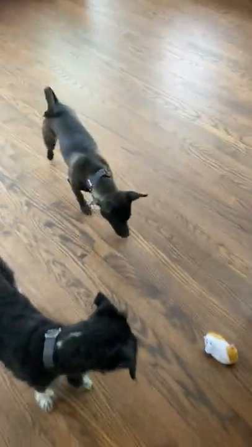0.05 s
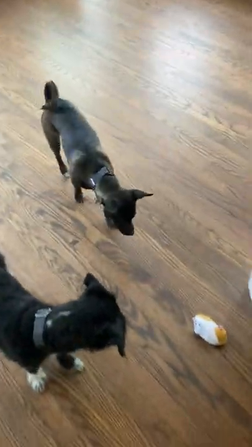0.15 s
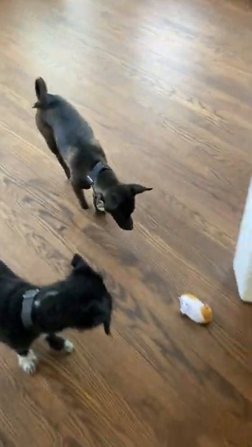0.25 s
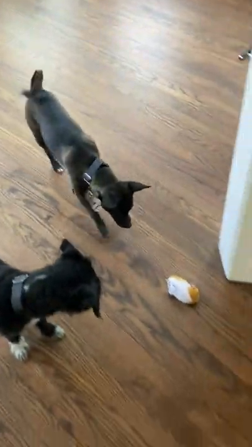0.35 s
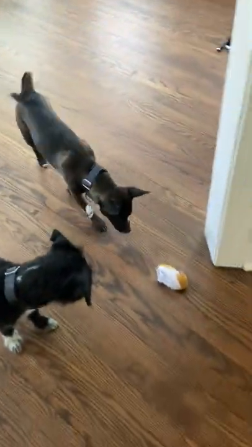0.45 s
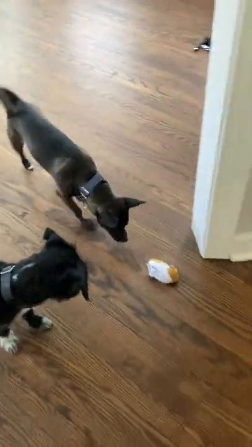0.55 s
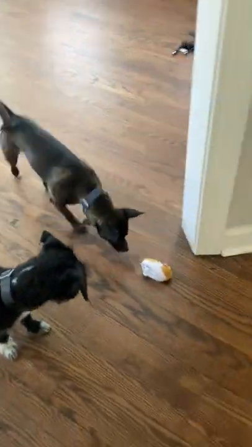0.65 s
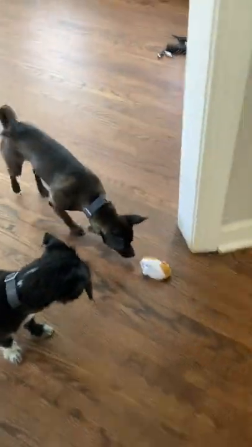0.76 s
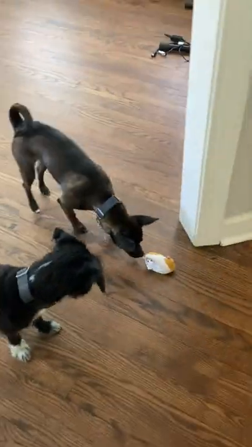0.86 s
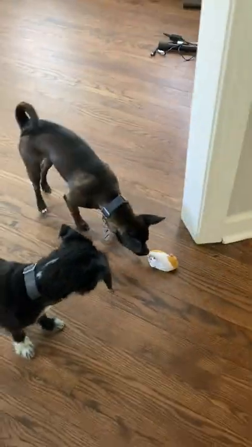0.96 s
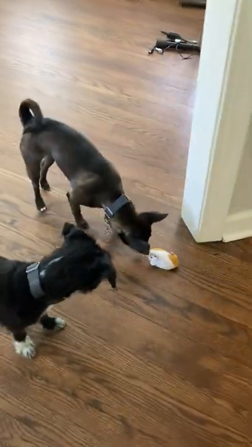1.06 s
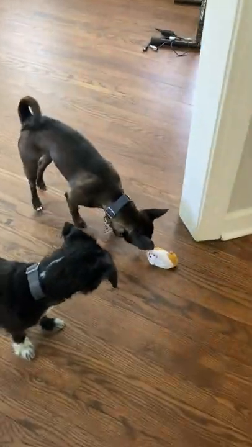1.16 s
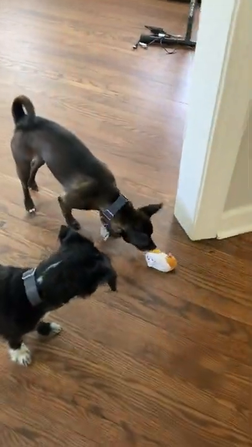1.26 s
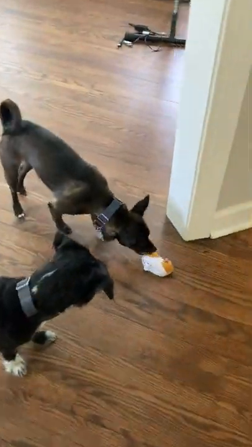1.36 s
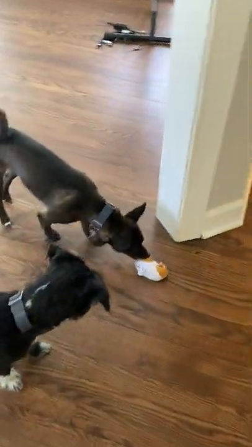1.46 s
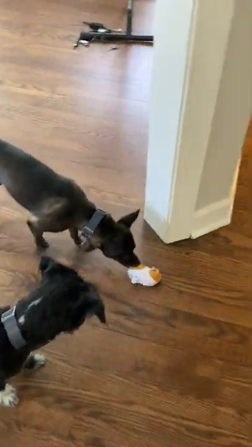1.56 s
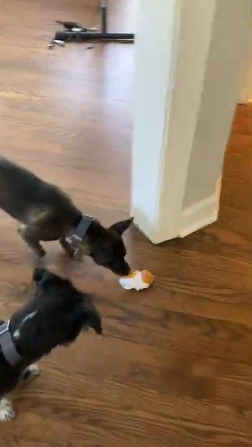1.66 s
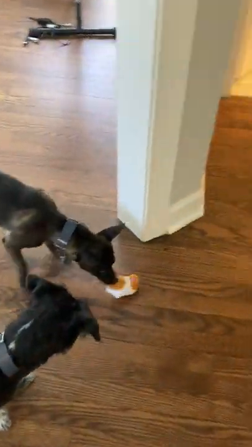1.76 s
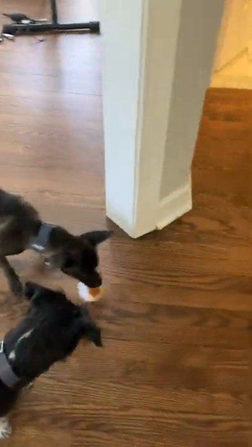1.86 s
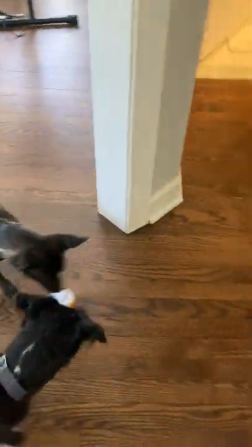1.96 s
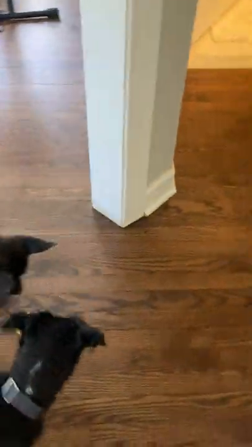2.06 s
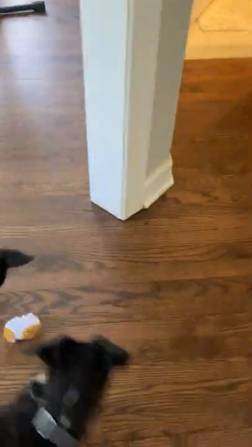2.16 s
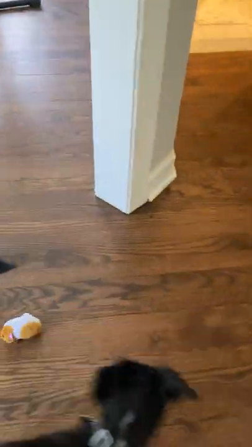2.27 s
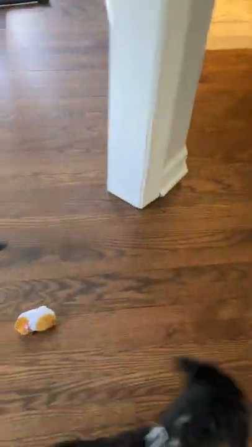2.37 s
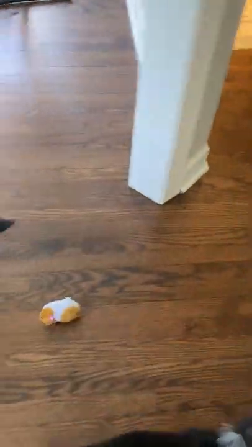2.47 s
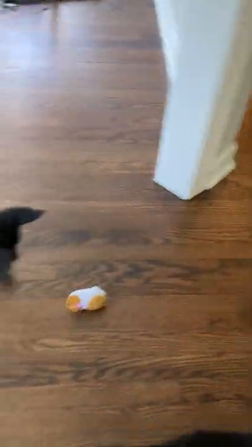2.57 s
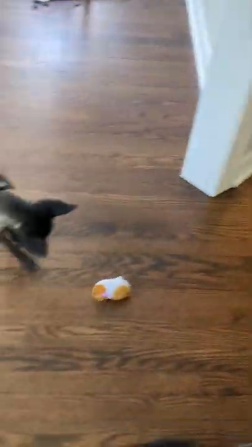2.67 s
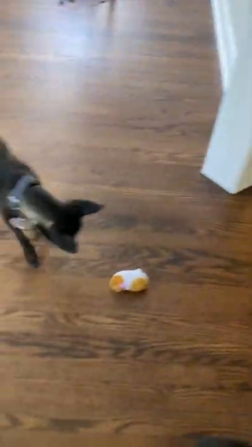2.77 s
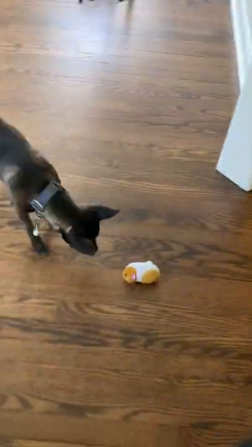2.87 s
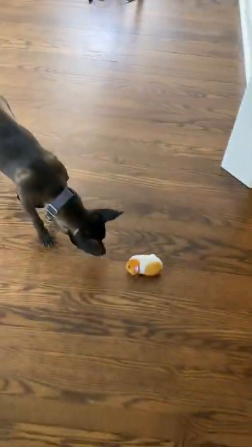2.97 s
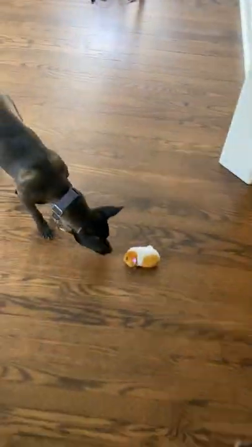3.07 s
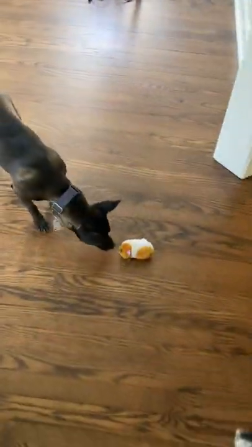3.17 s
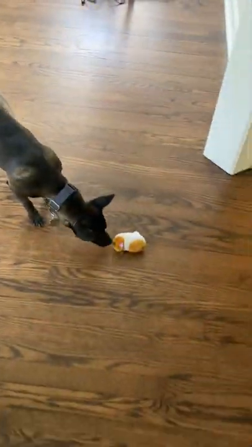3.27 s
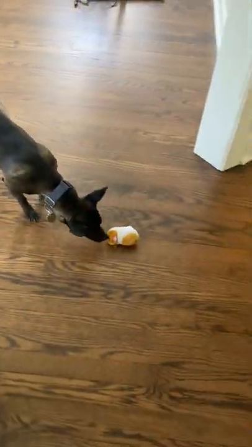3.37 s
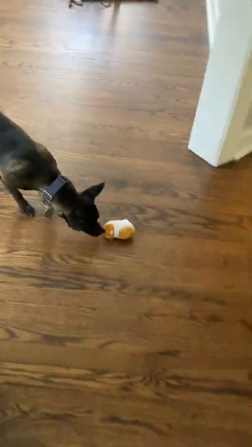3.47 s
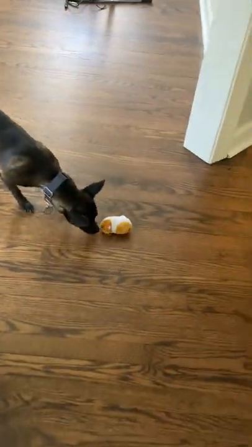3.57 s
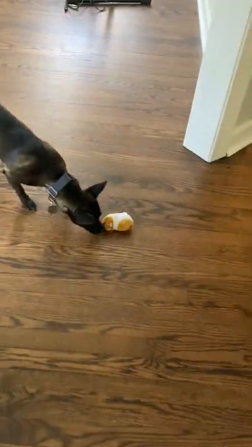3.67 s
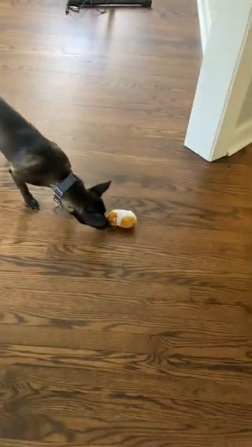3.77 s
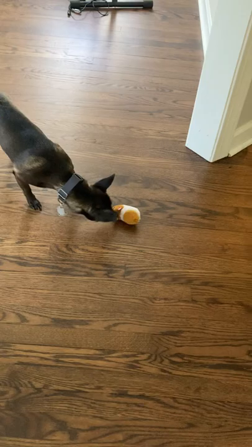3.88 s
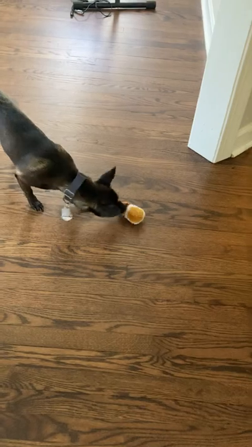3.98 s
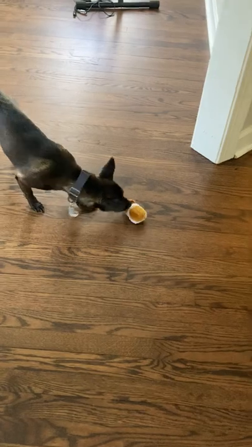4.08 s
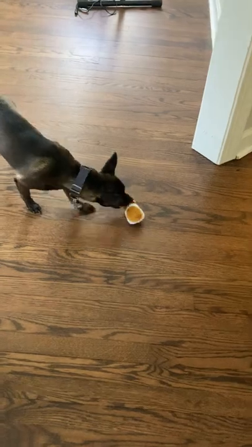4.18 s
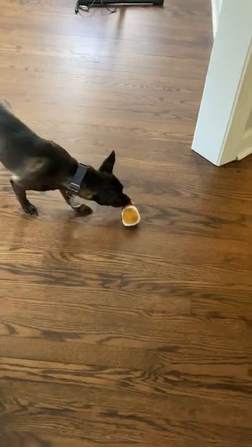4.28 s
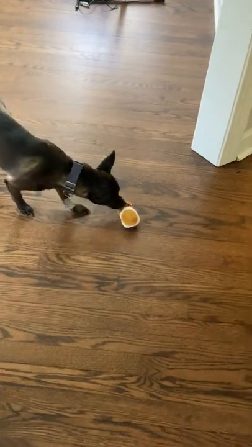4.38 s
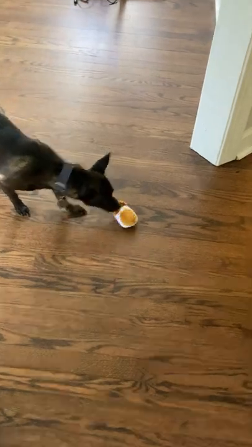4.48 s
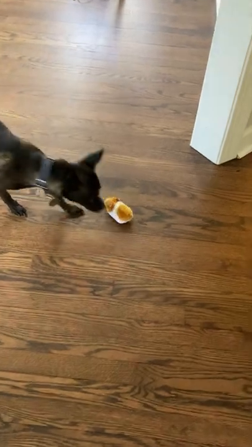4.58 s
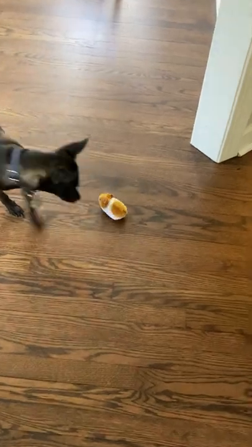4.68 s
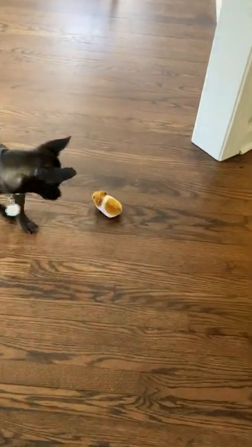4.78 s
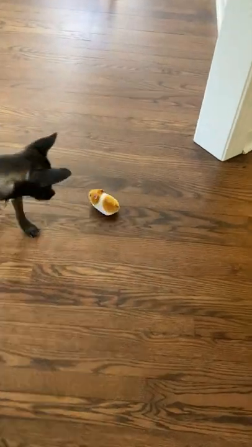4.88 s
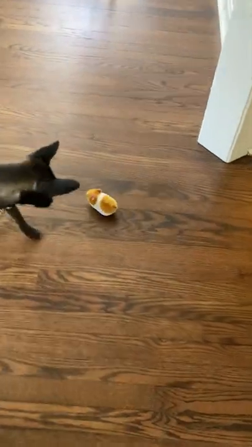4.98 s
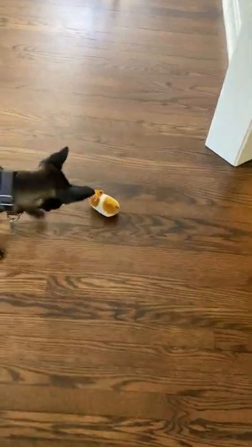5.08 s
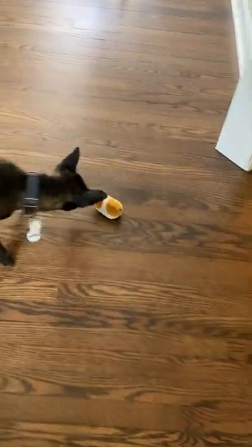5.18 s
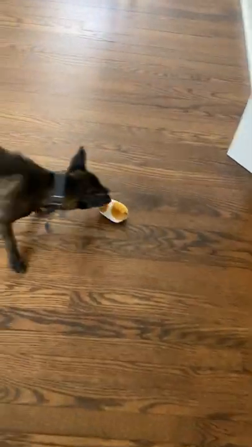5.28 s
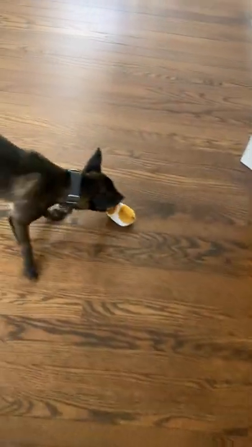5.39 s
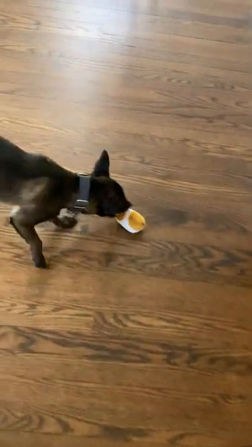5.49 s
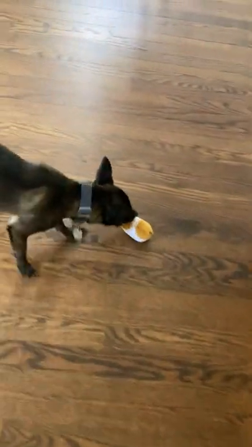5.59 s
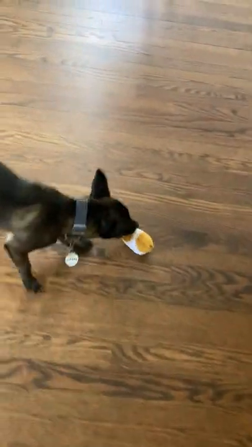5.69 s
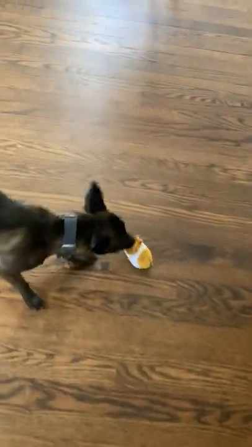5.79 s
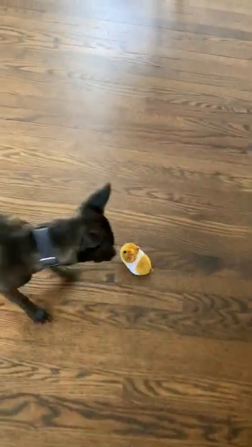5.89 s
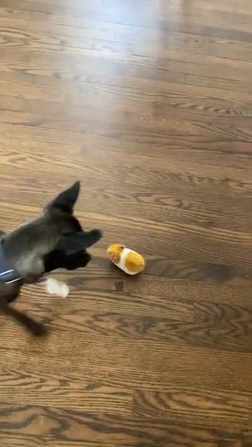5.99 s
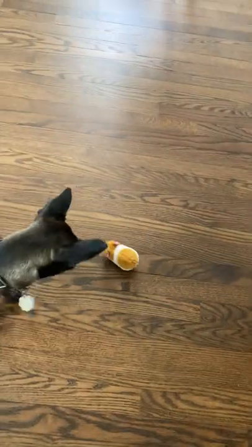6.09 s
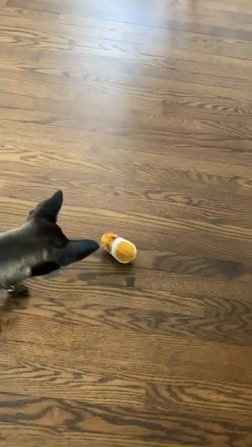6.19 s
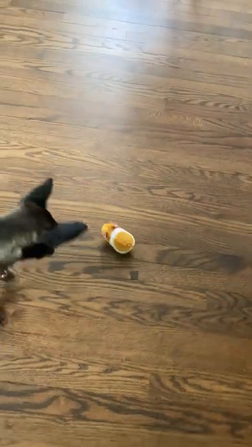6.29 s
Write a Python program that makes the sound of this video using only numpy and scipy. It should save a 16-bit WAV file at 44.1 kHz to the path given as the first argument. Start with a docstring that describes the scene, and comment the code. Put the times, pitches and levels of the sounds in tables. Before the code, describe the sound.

Dog collar tags clink in short bright bursts as claws click and paws thud on a wood floor beside a faintly whirring toy.

```python
"""Collar tags clink: each meeting excites decaying metal modes, beside the clear tones of a collar ring.
Dogs' claws click, as noise ticks and damped board modes; paws thud, as fading narrow-band floor booms.
Pads and a toy slide with filtered friction noise; the toy's motor whirs, gear teeth ringing its shell.
House hum and drifting room tone lie beneath, and the bare room adds a decaying noise tail.
A stereo widening shifts the right channel's phase, and a low-pass removes the highest treble."""
import sys
import numpy as np
from scipy import signal
from scipy.fft import rfft, irfft, next_fast_len
from scipy.io import wavfile
from scipy.ndimage import uniform_filter1d

SR = 44100
rng = np.random.default_rng(int(sys.argv[2]) if len(sys.argv) > 2 else 0)


def voltage_ratio(decibels):
    """Convert decibels (scalar or array-like) to amplitude ratios, 20 dB per decade."""
    exponent = np.asarray(decibels, float) / 20
    return 10 ** exponent


def materialize(psi):
    """Save the field psi as 16-bit PCM at rate SR to the path in sys.argv[1].

    A 1-D psi becomes a single channel; in a 2-D psi each row is a channel.
    """
    bounded = np.clip(np.atleast_2d(psi).T, -1, 1)
    quanta = np.round(bounded * 32767).astype(np.int16)
    wavfile.write(sys.argv[1], SR, quanta)


N = 279594
T = np.arange(N) / SR  # seconds

# Ringing modes of a floor board. Each row: frequency in Hz, bandwidth in Hz, relative level in dB.
KNOCK = [(1001, 190, -10.5), (1120, 200, -5.5), (1340, 470, -1.5), (1667, 260, -1), (1920, 220, 0),
         (2360, 200, 6.5)]


def colour(x, points):
    """Linear filtering in the frequency domain: (Hz, dB) points joined on a log-frequency axis."""
    hz, db = np.transpose(points)
    size = next_fast_len(N, real=True)
    f = np.arange(size // 2 + 1) * SR / size
    gain = voltage_ratio(np.interp(np.log(f + 1), np.log(hz), db))
    return irfft(rfft(x, size) * gain, size)[..., :N]


def ring(x, modes):
    """Modal superposition: two-pole resonances (Hz, width Hz, dB) summed with alternating sign."""
    out = 0
    for k, (hz, width, db) in enumerate(modes):
        out = out + (-1) ** k * voltage_ratio(db) * signal.lfilter(*signal.iirpeak(hz, hz / width, SR), x)
    return out


def unit(x):
    """Normalization of a signal to an rms of 1."""
    return x / np.sqrt(np.mean(x ** 2))


def walk(rate):
    """Slow random modulation: `rate` new levels a second joined by straight lines, spread near 1."""
    k = int(SR / rate)
    levels = np.repeat(rng.standard_normal(N // k + 1), k)
    return 1.2 * uniform_filter1d(levels, k)[:N]


def bursts(times, peak_db, fade_s):
    """Impulsive contact noise: white noise under a critically damped envelope that swells and fades."""
    env = np.zeros(N)
    env[(np.asarray(times) * SR).astype(int)] = voltage_ratio(peak_db)
    pole = np.exp(-1 / (fade_s * SR))
    env = signal.lfilter([np.e * (1 - pole)], [1, -2 * pole, pole ** 2], env)
    return env * rng.standard_normal(N)


def house():
    """Broadband and tonal background: noise bands drift alone, and narrow-band hum wavers around tones."""
    # Room tone. Each row: frequency in Hz, spectral density in dB per Hz before the drift.
    air_density = [(28, -130), (40, -99), (55, -70.5), (90, -79.5), (160, -74.5), (260, -82.5), (400, -88),
                   (700, -94.5), (1300, -98), (2000, -102), (3000, -105), (5000, -103), (6000, -106),
                   (9000, -102), (15000, -104)]
    # Limits in Hz between the bands that drift alone.
    air_splits_hz = [300, 900, 2500]
    # Hum. Each row: frequency in Hz, width in Hz, steady tone against the noise part in dB,
    # then the level in dB at each of the hum times.
    hum_modes = [(58.5, 2.53, -2, -67, -64, -69, -65), (120.4, 2.87, 1, -53.5, -51.5, -59.5, -52),
                 (221.8, 7.6, -5.5, -58, -59.5, -61, -64), (252.5, 3.555, 1, -65, -63, -56, -63.5),
                 (343.8, 6, -9.5, -73, -71, -67, -70), (506, 14, -11, -70, -73.5, -76.5, -79)]
    # Times in seconds of the hum levels.
    hum_s = [0, 2.6, 3.6, 6.34]

    # the two channels get unrelated noise
    rest = colour(rng.standard_normal((2, N)), air_density) * np.sqrt(SR) * voltage_ratio(0.55 * walk(5.6))
    air = 0
    for hz in air_splits_hz:
        low = signal.sosfilt(signal.butter(2, hz, fs=SR, output="sos"), rest)
        air = air + low * voltage_ratio(0.7 * walk(1.7) + 1.2 * walk(12))
        rest = rest - low
    top_band = rest * voltage_ratio(1.8 * walk(1.63))

    noise, hum = rng.standard_normal(N), 0
    for hz, width, tone_db, *db in hum_modes:
        tone = np.sqrt(2) * np.sin(2 * np.pi * np.cumsum(hz + width * walk(4.0)) / SR)
        flutter = unit(ring(noise, [(hz, width, 0)]))
        hum = hum + voltage_ratio(np.interp(T, hum_s, db)) * unit(flutter + voltage_ratio(tone_db) * tone)
    return air + top_band + hum


def toy():
    """Periodic excitation of a resonator: gear teeth tick unevenly each motor turn and ring the shell."""
    # Motor, slowed when a nose holds it. Each row: time in seconds, mean turns per second,
    # level in dB, slip (unsteady speed) from 0 to 1, turned away from 0 to 1.
    motor = [(0, 103.3, -51.5, 0.02, 0.37), (.5, 103, -55.5, 0.03, 0.2), (.9, 102.7, -54.5, 0, 0.17),
             (1.35, 102.7, -53, 0, 0.14), (1.7, 101.9, -56.5, 0.12, 0.54), (1.9, 95.5, -60, 0.35, 0.6),
             (2.8, 96.5, -54, 0.38, 0.39), (3.1, 102.9, -59, 0.07, 0.6), (3.8, 103.8, -62.5, 0.02, 0.16),
             (4.1, 91.4, -65, 0.23, 1), (4.9, 86.3, -59.5, 0.14, 0.9), (5.5, 88.6, -57.5, 0.61, 0.53),
             (6.34, 88.8, -60, 0.47, 0.8)]
    # Plastic shell resonances. Each row: frequency in Hz, width in Hz of the first of two filters,
    # level in dB facing, level in dB turned away, other teeth in dB, loose rattle noise in dB.
    shell_modes = [(1865, 44, -13, -7, 11, -33), (2524, 270, -12, -1.5, 4.5, -29),
                   (4180, 1260, -17.5, 1, 7, -22.5), (6550, 280, 0.5, 5.5, 3, -26),
                   (8230, 300, -6, 12, -5.5, -29), (8605, 460, 1, 2.5, 0, -27.5),
                   (10180, 640, 1, -0.5, -7, -27), (11150, 830, 1, -6, -8.5, -19),
                   (10960, 660, -9.5, 2.5, 3, -39), (12240, 1160, -0.5, -2.5, 6, -33),
                   (13850, 2300, -2.5, -22, -12, -22)]
    teeth = [(0, -1.5), (0.26, -11.0), (0.45, 1), (0.71, 1.0)]  # place within a turn, dB

    times = np.array(motor)[:, 0]
    _, hz, db, slip, away = (np.interp(T, times, column) for column in np.transpose(motor))
    turns = np.cumsum(hz * (1 + 0.000384 * walk(6.6) + 0.05 * slip * walk(25))) / SR
    ticks, taps = np.zeros((4, N + 16)), np.arange(16)
    for row, (place, tooth_db) in zip(ticks, teeth):
        at = np.interp(np.arange(1, turns[-1] - 1) + place, turns, np.arange(N))[:, None]
        chance = rng.standard_normal((800, 1))[:len(at)]
        size = voltage_ratio(tooth_db + 1.2 * chance)
        # a windowed sinc places each tick between samples
        np.add.at(row, at.astype(int) + taps, size * np.sinc(taps - 8 - at % 1) * np.hanning(16))
    first_tooth = ticks[0, :N]
    other_teeth = ticks[1:, :N].sum(axis=0)
    rattle = rng.standard_normal(N)

    away = np.clip(away, 0, 1)
    shell = 0
    for f, width, near_db, far_db, others_db, rattle_db in shell_modes:
        drive = first_tooth + voltage_ratio(others_db) * other_teeth + voltage_ratio(rattle_db) * rattle
        rung = ring(ring(drive, [(f, width, 0)]), [(f, 2.0 * width, 0)])
        shell = shell + voltage_ratio(near_db + away * (far_db - near_db)) * rung
    return voltage_ratio(db) * unit(shell)


def slides():
    """Stick-slip friction: small random catches make a low scrape, grit and a bright rustle."""
    # Pads and toy sliding. Each row: start in seconds, length in seconds until the release,
    # relative level in dB, grit against it in dB, treble against it in dB.
    slide_rows = [(1.785, 0.037, -59, 0, -12), (2.059, 0.19, -43.5, -5.5, -2.5),
                  (2.254, 0.21, -52.5, 2.5, 1), (3.397, 0.096, -65, -2, -2), (3.736, 0.04, -63, -3, -2),
                  (3.948, 0.058, -51.5, 1.5, -3.5), (4.083, 0.053, -58, -4.5, -15),
                  (4.202, 0.12, -60, -5, -13), (4.412, 0.03, -56.5, -2.5, -19),
                  (4.438, 0.033, -56.5, -2, -16), (4.506, 0.1, -53.5, 4.5, -4.5),
                  (5.068, 0.049, -66.5, -2, -21), (5.538, 0.039, -64, -1, 6), (5.765, 0.043, -58.5, -7, 6),
                  (5.994, 0.032, -61, 14, -7), (6.055, 0.18, -55, 0.5, -2)]
    # Scrape spectrum. Each row: frequency in Hz, relative level in dB.
    scrape_points = [(400, -15), (750, -6), (900, -3), (1030, -3), (1180, 1), (1500, -5.5), (1900, -3),
                     (2400, -19), (3000, -17.5)]
    # Grit spectrum. Each row: frequency in Hz, relative level in dB.
    grit_points = [(2000, -23), (2800, -5), (3500, -7), (4300, -1.5), (5000, -1), (6500, -32)]
    attack_s, sag_db_s, release_db_s = 0.0064, 49.5, 161
    pecks_per_s, peck_db = 90, -8  # tiny knocks on the board within a slide

    chance = rng.exponential(size=N // 100 + 1).repeat(100)[:N]
    catches = voltage_ratio(2.8 * np.minimum(chance, 5.0))
    friction = rng.standard_normal((3, N)) * uniform_filter1d(catches, size=30) * voltage_ratio(4.5 * walk(30))
    pecks = (rng.random(N) < pecks_per_s / SR) * rng.standard_normal(N)
    scrape = unit(colour(friction[0], scrape_points)) + voltage_ratio(peck_db) * unit(ring(pecks, KNOCK))
    rustle = unit(ring(friction[1], [(8850, 1300, 0)]))
    sand = unit(colour(friction[2], grit_points))
    out = np.zeros(N)
    for s, length, db, grit_db, treble_db in slide_rows:
        age = np.clip(T - s, 0, None)
        fall_db = sag_db_s * age + release_db_s * np.clip(age - length, 0, None)
        swell = voltage_ratio(db - fall_db) * np.minimum(age / attack_s, 1)
        out += swell * (scrape + voltage_ratio(grit_db) * sand + voltage_ratio(treble_db) * rustle)
    return out


def paws():
    """Impact excitation of damped floor modes: soft landings boom most near the pitch of the spot."""
    # Paws landing. Each row: time in seconds, relative level in dB, pitch of the spot in Hz.
    thuds = [(2.073, -35, 121), (2.25, -48.5, 152), (3.967, -45, 155), (4.516, -42.5, 220),
             (4.799, -50, 85), (5.125, -52, 123.8), (5.753, -39.5, 433), (5.766, -44.5, 416),
             (5.757, -44, 110), (6.013, -44, 230), (6.017, -45, 99)]
    # Floor booms. Each row: frequency in Hz, width in Hz of each of two filters, 60 dB decay in seconds.
    floor_modes = [(85, 97, 0.65), (110.6, 110, 0.47), (155, 80, 0.41), (259, 195, 0.64), (391, 152, 0.29)]
    db_per_octave = 12  # booms away from the spot's pitch are weaker

    noise, out = rng.standard_normal(N), 0
    for hz, width, t60 in floor_modes:
        boom = unit(ring(ring(noise, [(hz, width, 0)]), [(hz, width, 0)]))  # twice: steep flanks
        for s, db, spot_hz in thuds:
            age = np.clip(T - s, 0, None)
            peak_db = db - 2.0 - db_per_octave * abs(np.log2(hz / spot_hz))
            out = out + boom * voltage_ratio(peak_db - 60 * age / t60) * (1 - np.exp(-age / 0.00027))
    return out


def strike(times, peak_db, spot_hz, modes, slope_db):
    """Modal impact: each blow briefly rings slightly detuned modes, most of all those near its pitch."""
    age, out = np.arange(1000) / SR, np.zeros(N + 2000)
    hz, width, db = np.transpose(modes)[:, :, None]
    fade = age * np.pi * width
    shape = (-1) ** np.arange(len(modes))[:, None] * fade * np.exp(1 - fade)
    chance = rng.standard_normal((len(times), 3, len(modes), 1))
    for s, blow_db, spot, (size, tune, late) in zip(times, peak_db, spot_hz, chance):
        mode_db = blow_db + db - slope_db * abs(np.log2(hz / spot)) + 2.4 * size
        rings = voltage_ratio(mode_db) * shape * np.sin(2 * np.pi * hz * (1 + 0.037 * tune) * age)
        starts = ((s + 0.0005 * abs(late[:, 0])) * SR).astype(int)  # the contact rolls a little
        for start, one in zip(starts, rings):
            out[start:start + len(age)] += one
    return out[:N]


def claws():
    """Hard impact: contact noise as tick and crack, with damped modes of the claw and the board."""
    # Claws and toy striking the boards. Each row: time in seconds, tick in relative dB,
    # knock in relative dB, knock pitch in Hz, clack in relative dB, clack pitch in Hz.
    clicks = [(0.1208, -47.5, -58, 1860, -61, 4000), (1.7471, -46, -46, 1110, -51.5, 2500),
              (1.7927, -39.5, -51, 1590, -44, 2500), (2.0702, -19.5, -15.5, 1120, -34, 4150),
              (2.178, -26.5, -64, 1150, -60, 2500), (2.181, -35, -62, 1170, -60, 2500),
              (2.2463, -28.5, -28, 1460, -38.5, 3400), (2.098, -30, -38, 1150, -46, 3600),
              (2.122, -36, -36, 1600, -50, 3600), (2.209, -47, -44, 1100, -50, 2500),
              (2.29, -50, -37, 1250, -41, 3200), (2.335, -54, -44, 1200, -46, 3200),
              (2.435, -52, -48, 1390, -61, 3000), (2.4499, -38, -46, 1910, -63, 3000),
              (2.677, -70, -54, 1177, -57, 2570), (3.2454, -43, -50, 1354, -50, 4340),
              (3.4073, -47, -70, 2140, -42, 2850), (3.578, -56, -70, 1396, -59, 4120),
              (3.591, -48.5, -56, 1366, -58, 4140), (3.677, -54, -76, 1500, -59, 4570),
              (3.739, -43.5, -47, 1350, -59, 2780), (3.917, -45, -71, 955, -69, 3080),
              (3.958, -45, -49, 1290, -59, 4060), (4.014, -50, -53, 1713, -40.5, 4190),
              (4.0329, -42.5, -59, 1680, -46, 4180), (4.094, -57, -50, 1100, -60, 3120),
              (4.2, -60, -46, 1240, -65, 3950), (4.268, -64, -55, 1103, -68, 3970),
              (4.3, -42.5, -47, 1160, -49, 3230), (4.465, -52, -56, 1590, -49, 3340),
              (4.5119, -32.5, -33.5, 1230, -40, 2500), (4.542, -36, -50, 1160, -37, 4600),
              (4.5831, -39, -40, 1293, -40, 2770), (4.5828, -60, -70, 1300, -37, 4060),
              (4.593, -43, -60, 1660, -36, 4300), (4.7054, -45, -62, 1870, -55, 3940),
              (4.7163, -38.5, -63, 1880, -52, 4040), (4.855, -42.5, -72, 1300, -70, 4010),
              (4.951, -51, -72, 1312, -49.5, 4130), (5.1608, -42, -57, 1360, -51, 4250),
              (5.7475, -20, -27, 1210, -32.5, 3200), (5.8124, -54, -45, 967, -55, 2500),
              (5.965, -38.5, -52.5, 1930, -49, 2500), (5.983, -43, -61, 1413, -52, 4030),
              (6.0057, -29, -47, 2140, -31, 2730), (6.008, -24, -31.5, 1200, -38, 3080),
              (6.0587, -39, -35, 1010, -28, 4240), (6.0595, -50, -63, 1600, -37, 2890),
              (6.089, -50, -30, 1050, -54, 4300), (6.107, -41, -54, 1500, -48, 4450)]
    # Claw ring. Each row: frequency in Hz, width in Hz, relative level in dB.
    clack_modes = [(2500, 520, 2.5), (2660, 260, 2), (3200, 210, -6), (3424, 590, 6), (4230, 730, 3.5),
                   (4600, 680, 3.5)]
    # Broad crack of a knock. Each row: frequency in Hz, relative level in dB.
    crack_points = [(300, -28), (900, -21.5), (2300, 5), (4500, -12), (6000, -7)]
    crack_db = -13  # against the knock
    tick_points = [(1500, -34), (3500, -4.5), (5000, -2.5), (6000, 3.5),
                   (8500, -1.5), (12000, -0.5), (15500, -12.5)]  # Hz, dB

    s, tick_db, knock_db, knock_hz, clack_db, clack_hz = np.transpose(clicks)
    tick = colour(bursts(s, tick_db + 4.5, 0.00096), tick_points)
    crack = colour(bursts(s, knock_db + crack_db, 0.0017), crack_points)
    # modes away from the blow's pitch weaken by the last argument, in dB per octave
    knock = strike(s, knock_db, knock_hz, KNOCK, 18.5)
    clack = strike(s, clack_db, clack_hz, clack_modes, 27)
    return tick + crack + knock + clack


def collar_ring():
    """Free vibration with added damping: two clear modes fade until the fur mutes them."""
    # A tag touching the collar ring. Each row: time in seconds, high mode in dB, low mode in dB,
    # seconds until muted; levels stand before the flutter.
    ring_hits = [(2.2475, -54, -66, .03), (2.3481, -45, -60, .05), (2.7215, -45, -49.5, .09),
                 (2.918, -47.5, -60, 0.061), (5.435, -51, -66, 0.053), (5.5475, -59, -68, .03),
                 (5.589, -51, -68, .02), (6.1165, -49, -66, .04)]
    # The high and the low mode in Hz.
    ring_hz = [9218, 4242]
    t60_s, mute_db_s = 0.4, 1500

    out = 0
    for s, high_db, low_db, length in ring_hits:
        age = np.clip(T - s, 0, None)
        fall_db = 60 * age / t60_s + mute_db_s * np.clip(age - length, 0, None)
        for hz, db in zip(ring_hz, [high_db, low_db]):
            out = out + voltage_ratio(db - fall_db) * np.sin(2 * np.pi * hz * age)
    return out * voltage_ratio(1.6 * walk(90))


def tags():
    """Repeated modal excitation: each meeting stops the last ring and starts every mode anew."""
    # Tag modes. Each row: frequency in Hz, tag 0 or 1.
    tag_modes = [(6477, 0), (6545, 0), (12772, 0), (14800, 0), (14730, 0), (13005, 1), (14635, 1)]
    # How each mode rings. Each row: 60 dB decay in seconds, dB when struck at place 0, dB at place 1.
    tag_ring = [(0.2, 4, 4), (0.13, -13, -6), (0.19, 4, -22), (0.14, -14, -1), (0.17, -16, 8.5),
                (0.13, 8, -9.5), (0.15, -11, 8)]
    # Tags meeting. Each row: time in seconds, first tag in relative dB, place struck from 0 to 1,
    # second tag in relative dB, place struck from 0 to 1.
    clinks = [(0.2354, -49, 0.9, -47.5, 0.1), (1.5409, -57, 0.7, -53, 0.1), (2.2475, -28, 0.74, -28.5, 0.5),
              (2.265, -33.5, 0.05, -48, 0.5), (2.286, -42, 0.5, -39, 0.4), (2.3481, -22.5, 0.53, -50, 0.87),
              (2.3715, -29, 0.6, -48, 0.87), (2.4344, -44.5, 0.84, -57, 0.5),
              (2.5065, -38, 0.14, -44, 0.57), (2.7215, -37, 0.37, -35, 0.7), (2.918, -39, 0.04, -37, 0.45),
              (3.0097, -51.5, 0.55, -42.5, 0.25), (3.4064, -69, 1, -49, 0.7), (3.592, -72, 1, -64, .8),
              (4.7536, -39, 0.47, -60, 0.5), (4.7666, -46, 1, -45, 0.65), (5.2724, -56, 0.55, -62, 0.98),
              (5.3175, -47, 0.46, -44.5, 0.36), (5.3537, -51, 0.7, -40, 0.35),
              (5.435, -38.5, 0.87, -41, 0.45), (5.487, -48, 0.57, -42, 0.57),
              (5.5475, -49, 0.56, -39.5, 0.5), (5.589, -41, 0.45, -40, 0.4),
              (5.6111, -42.5, 0.82, -37.5, 0.28), (5.621, -52, 0.58, -45, 0.33),
              (6.0846, -45, 0.8, -68, .82), (6.1165, -21.5, 0.23, -45, 0.8), (6.142, -32.5, 0, -54, 0.4),
              (6.1993, -39, 0.48, -44.5, 0.1)]
    # Changes in the tags' ring level between clinks. Each row: time in seconds,
    # dB lost, negative where it swells.
    level_changes = [(0.27, -8), (2.298, 1), (2.364, 3), (2.395, 10), (2.446, 17), (2.752, -3), (2.976, 5),
                     (3.047, 15), (3.421, 11), (4.79, -4), (5.325, 6), (5.366, 2), (5.50, 5), (5.555, 4),
                     (5.596, 10), (5.63, -6), (5.655, 8), (6.096, 14), (6.128, 4), (6.173, 13), (6.228, 13)]
    change_s = 0.0038  # time each change takes
    tick_points = [(1500, -19), (3500, -11), (6000, 13.5), (9500, -6.5), (15000, 9)]  # Hz, dB

    rows = np.array(clinks)
    last = np.clip(np.searchsorted(rows[:, 0], T) - 1, 0, None)  # the latest meeting
    began = rows[last, 0]
    age = T - began
    chance = rng.standard_normal((len(rows), 2 * len(tag_modes)))
    # a change lasts only until the next meeting
    lost_db = sum(db * np.clip((T - s) / change_s, 0, 1) * (began < s) for s, db in level_changes)
    out = 0
    for k, ((hz, tag), (t60, db_0, db_1)) in enumerate(zip(tag_modes, tag_ring)):
        db, place = rows[last, 3:].T if tag > 0.5 else rows[last, 1:3].T
        # random flicker of each mode's level, growing after the strike
        flicker_db = (1.7 * walk(70) + 2.2 * walk(220)) * np.clip(age / 0.012, 0.25, 1)
        wobble = 0.5 * chance[last, 2 * k + 1] + 0.6 * walk(120)  # radians
        struck_db = db + db_0 + place * (db_1 - db_0)
        size = voltage_ratio(struck_db - 60 * age / t60 + flicker_db - lost_db)
        detune = 1 + 0.00091 * chance[last, 2 * k]
        out = out + size * np.sin(2 * np.pi * hz * detune * age + wobble)
    onset = 1 - np.exp(-np.clip(age, 0, None) / 0.00071)
    tick = bursts(rows[:, 0], rows[:, 1::2].max(axis=1), 0.00038)  # follows the louder tag
    return out * onset + colour(tick, tick_points)


def room(x):
    """Diffuse reverberation: two unrelated noise tails whose decay time depends on frequency."""
    # Reverberation time. Each row: frequency in Hz, 60 dB decay in seconds.
    room_t60 = [(100, 0.69), (1000, 0.23), (4000, 0.38), (14000, 0.25)]

    known_hz, known_t60 = np.transpose(room_t60)
    age, tail = np.arange(SR // 2) / SR, 0
    for hz in 60 * 2. ** np.arange(0, 8.1, 1):
        t60 = np.interp(np.log(hz), np.log(known_hz), known_t60)
        band = signal.lfilter(*signal.iirpeak(hz, 1.2, SR), rng.standard_normal((2, len(age))))
        tail = tail + band * voltage_ratio(-60 * age / t60)
    tail = tail * (1 - np.exp(-(age / 0.00032) ** 2))  # the tail builds up in under a millisecond
    tail = tail / np.sqrt(np.mean(np.sum(tail ** 2, axis=1)))
    return signal.fftconvolve(x[None], tail, axes=1)[:, :N]


def scene():
    """Superposition of direct and reverberant sound: near sources are heard both ways."""
    hits, rubs = claws() + paws(), slides()
    metal = tags() + collar_ring() + toy()
    direct = hits + metal + voltage_ratio(2.5) * rubs
    to_room = hits + voltage_ratio(1.0) * rubs + voltage_ratio(-4.5) * metal
    return direct + voltage_ratio(-1) * room(to_room) + house()


def top_cut(x):
    """Nothing passes above the cut-off."""
    return signal.sosfilt(signal.butter(12, 16790, fs=SR, output="sos"), x)


def record(dry):
    """Stereo widening: the right channel lags by a frequency-dependent phase; the side share varies with Hz."""
    # Stereo widener. Each row: frequency in Hz, radians the right channel lags,
    # share of the left-right difference kept, right gain in dB.
    widener = [(0, 0.046, 0.078, 0.84), (360, 0.19, 0.26, 1), (720, 1.45, 0.95, 0.5),
               (1460, 0.17, 0.91, 1.6), (2265, 1.7, 0.85, 0), (3065, 1.86, 0.58, 2), (3400, 1.42, 1, 0.5),
               (4550, 1.9, 0.46, -1), (5000, 2.6, .15, 0), (5600, 3.14, .06, 0), (8600, 6.6, .1, 0),
               (11750, 9.42, .05, 0), (14800, 13, .08, 0), (22000, 37, .03, 12)]
    # Low-pass cutoff near 15.8 kHz. Each row: frequency in Hz, gain in dB.
    low_pass = [(15700, -0.5), (15850, -25), (16600, -28)]

    size = next_fast_len(N, real=True)
    f = np.arange(size // 2 + 1) * SR / size
    widener_hz = np.array(widener)[:, 0]
    _, lag, share, right_db = (np.interp(f, widener_hz, column) for column in np.transpose(widener))
    mid = rfft(dry[0] + dry[1], size) / 2
    side = share * rfft(dry[0] - dry[1], size) / 2
    left = mid + side
    right = voltage_ratio(right_db) * (mid - side) * np.exp(-1j * lag)
    gain = voltage_ratio(np.interp(f, *np.transpose(low_pass)))
    pair = irfft(np.array([left, right]) * gain, size)[:, :N]
    return top_cut(pair)


dry = scene()
out = record(dry)
materialize(out)
```